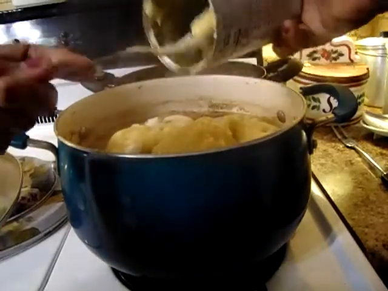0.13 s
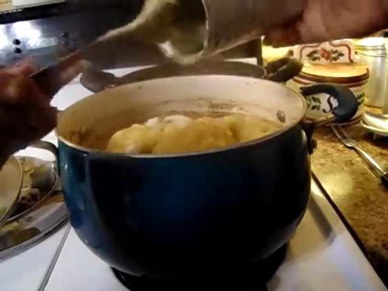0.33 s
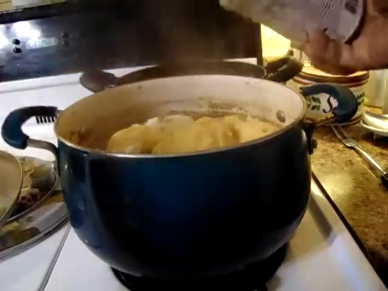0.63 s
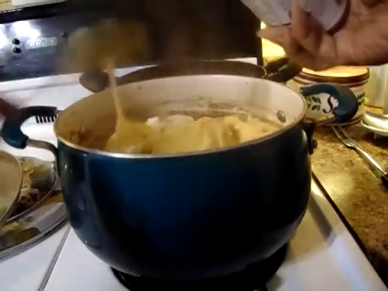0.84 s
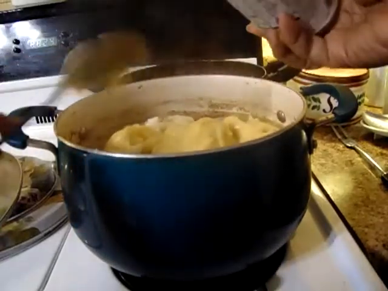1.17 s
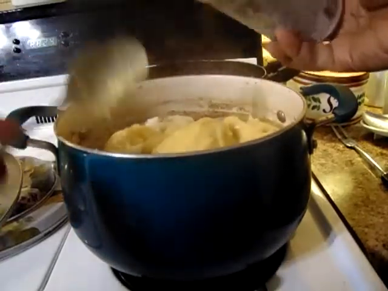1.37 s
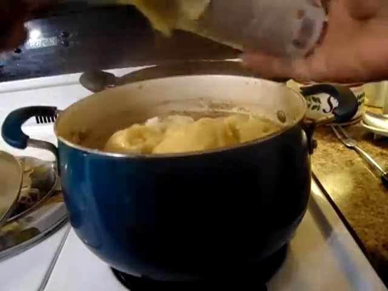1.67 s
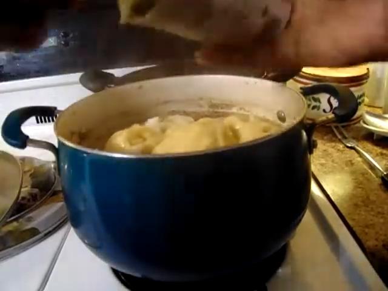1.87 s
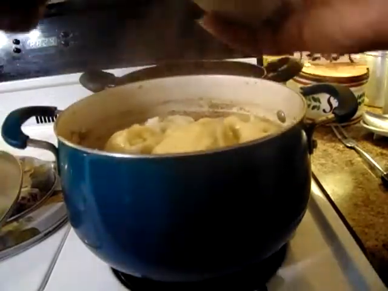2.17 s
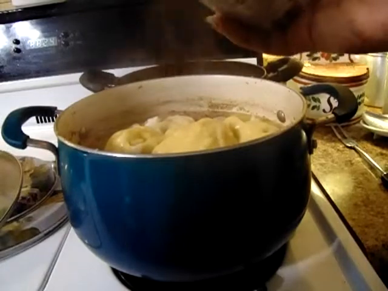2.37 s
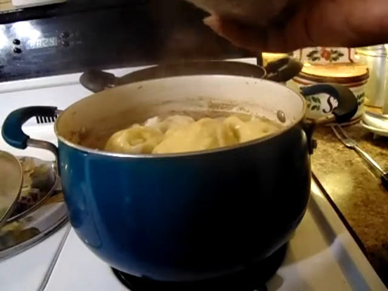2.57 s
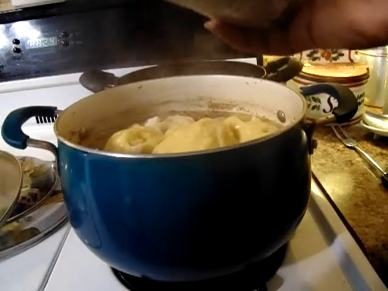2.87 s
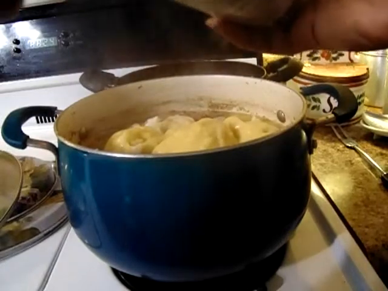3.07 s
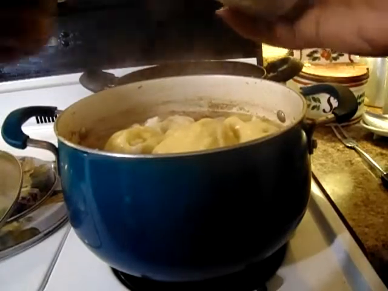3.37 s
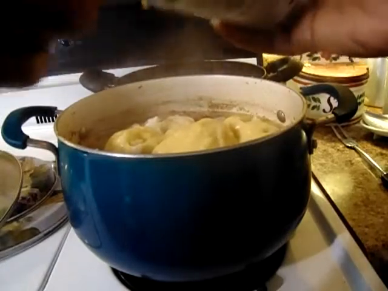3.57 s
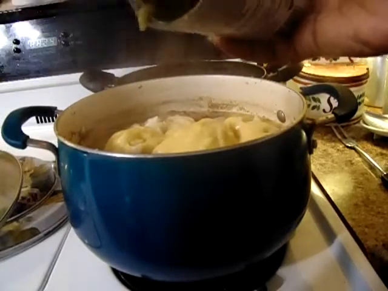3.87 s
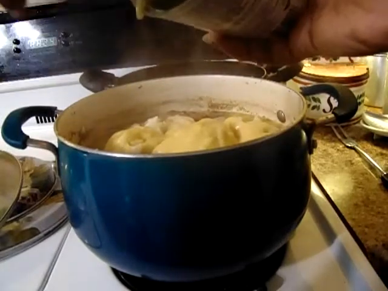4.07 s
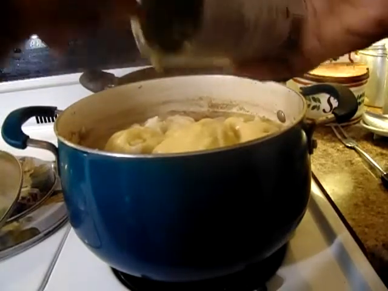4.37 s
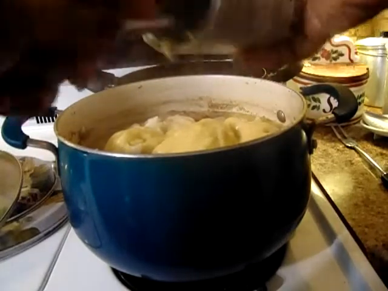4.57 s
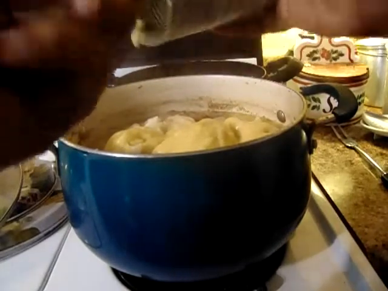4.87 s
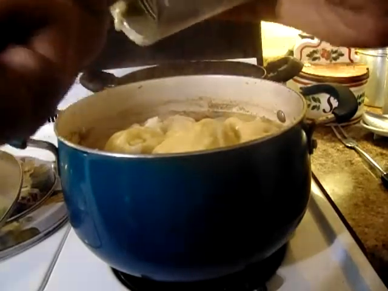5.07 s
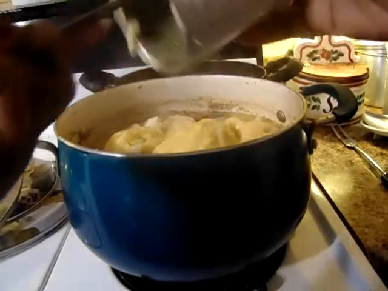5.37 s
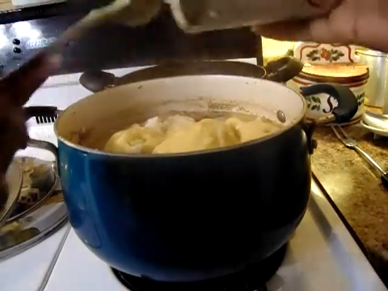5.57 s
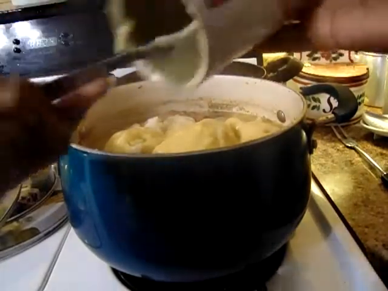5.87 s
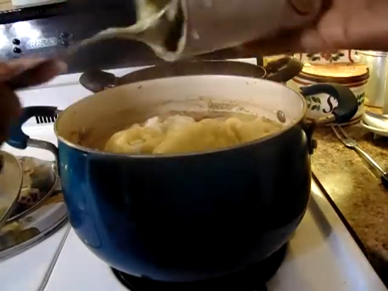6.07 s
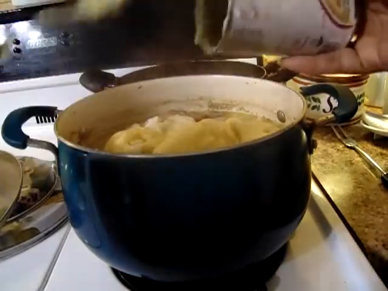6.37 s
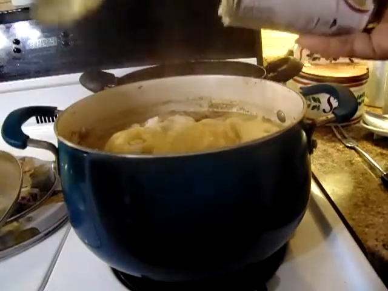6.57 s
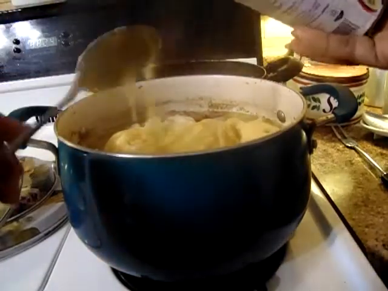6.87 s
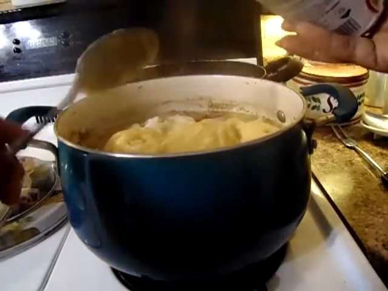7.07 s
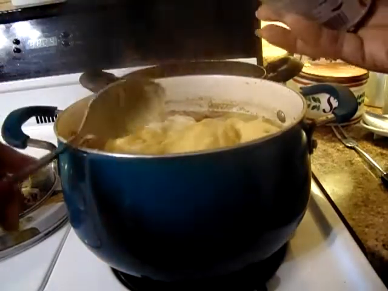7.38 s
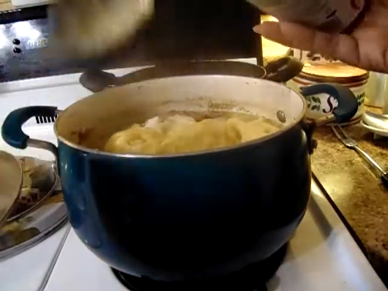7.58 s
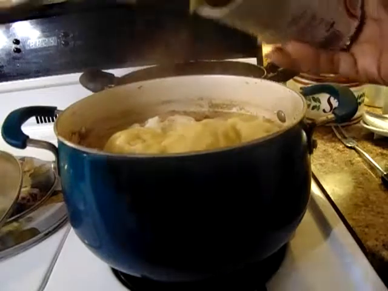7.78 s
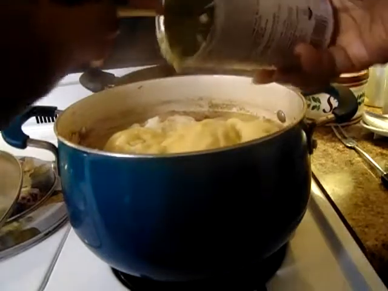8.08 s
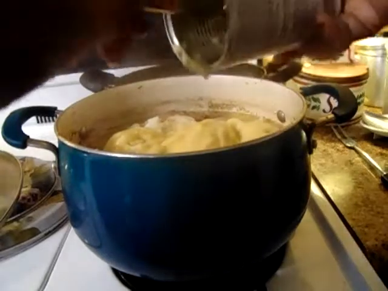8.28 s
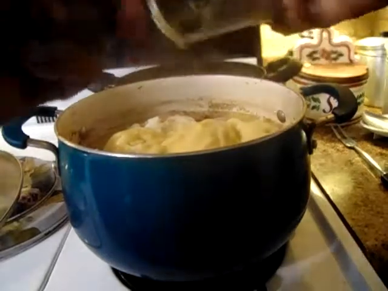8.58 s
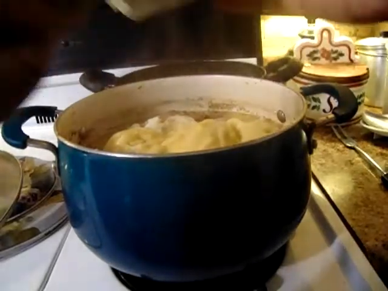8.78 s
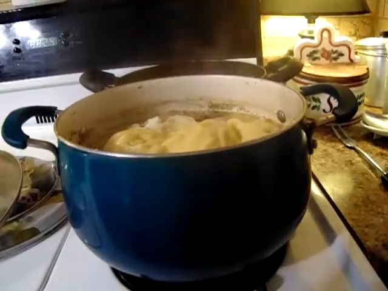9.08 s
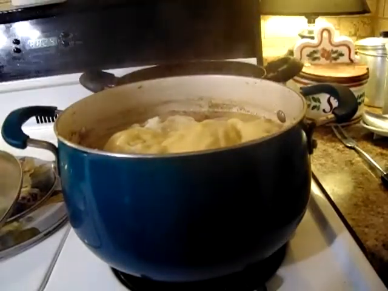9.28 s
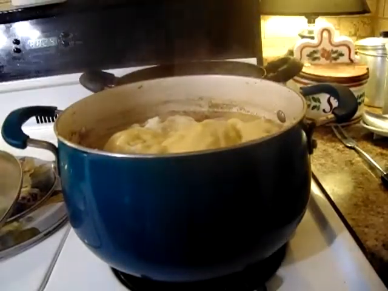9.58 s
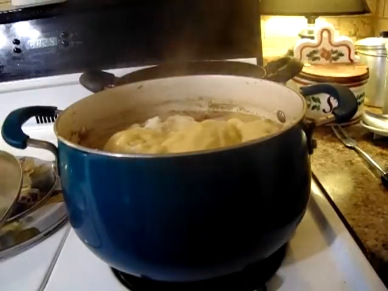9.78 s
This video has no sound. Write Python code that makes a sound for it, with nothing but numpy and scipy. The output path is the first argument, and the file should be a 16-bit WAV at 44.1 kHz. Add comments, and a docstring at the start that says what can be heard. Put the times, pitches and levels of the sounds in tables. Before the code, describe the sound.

Close up in a small kitchen, a steel spoon scrapes thick soup from a tin can with wet squelches, then raps four times on a pot's rim. A long, uneven run of hollow tinny clacks follows, then a brief rattle over ribs, a few more clacks and four more raps. Muffled scoops, another ribbed rattle and a singing scrape finish it, over a quiet simmer and faint hum.

```python
"""A steel spoon digs thick soup out of a tin can over a simmering pot, in a small kitchen.
Soup squelches and the spoon scrapes; four raps on the pot's rim shake the soup off. A long run of
clacks on the can's wall follows, then a rattle over its ribs, more clacks and four more raps.
Last come muffled scoops, a second rattle and a stroke on which the spoon sings. Blows are damped
modes with noise bursts, strokes are resonated noise; bubbles, seething, rumble and hum run throughout."""
import sys
import numpy as np
from scipy import signal
from scipy.fft import rfft, irfft, next_fast_len
from scipy.io import wavfile

SR = 44100
rng = np.random.default_rng(int(sys.argv[2]) if len(sys.argv) > 2 else 0)


def log_audio(samples):
    """Write samples as a 16-bit WAV file to the path given in sys.argv[1]."""
    # one column per channel
    frames = np.atleast_2d(samples).T
    # limit to full scale, then quantise
    limited = np.clip(frames, -1, 1)
    pcm = np.round(limited * 32767).astype(np.int16)
    wavfile.write(sys.argv[1], SR, pcm)


N = 437472
TIME = np.arange(N) / SR  # s, the whole scene
AGE = np.arange(SR // 5) / SR  # s since a blow

# Spoon against can. Each row: start in seconds, relative levels of force and of ring in dB, ring pitch
# in Hz, relative level of the air column in dB, place from 0 at the base to 1 at the mouth.
CLACKS = [(1.6676, -31, -27.5, 2710, -29, .55), (1.8541, -16, -19.5, 2380, -19.5, .55),
          (1.9714, -21, -16, 1850, -36, 0.8), (2.0103, -26.5, -26, 1730, -39, 0.37),
          (2.0972, -17.5, -33, 2070, -35, 0.41), (2.1587, -6, -2.5, 2130, -17.5, .35),
          (2.2252, -19.5, -24.5, 1780, -35, .3), (2.236, -25.5, -28, 2160, -38, 0.27),
          (2.366, -27, -46, 2290, -56, 0.34), (2.4213, -17, -11, 2320, -37, 0.24),
          (2.463, -22.5, -41, 2280, -41, 0.43), (2.4763, -21, -25, 1700, -39, 0.39),
          (2.624, -37, -58, 2470, -63, .3), (2.6591, -22, -17, 2345, -39, 0.29),
          (2.7177, -25.5, -24, 2290, -30, .4), (2.7258, -26, -18, 2190, -51, .7),
          (2.8455, -28.5, -42, 2640, -45, 0.31), (2.9094, -20, -12, 2284, -29.5, 0.31),
          (2.9628, -22, -13.5, 1753, -40, 0.71), (3.0036, -32.5, -27.5, 1720, -44, .55),
          (3.04, -25.5, -21.5, 2290, -33, .5), (3.085, -27.5, -31, 2600, -38.5, .35),
          (3.1187, -22.5, -19.5, 2250, -28, 0.31), (3.1832, -23.5, -21.5, 2210, -27, 0.32),
          (3.1914, -30, -37, 2400, -33.5, .6), (3.3322, -27, -27.5, 2300, -44, 0.42),
          (3.449, -21, -12.5, 2410, -27.5, 0.33), (3.4973, -26, -23.5, 2260, -24.5, .45),
          (3.5553, -37, -31, 1780, -56, 0.56), (3.6421, -33.5, -49, 2400, -48, .25),
          (3.6642, -22.5, -12.5, 2366, -29, 0.27), (3.7459, -19.5, -16.5, 2260, -21.5, 0.37),
          (3.7544, -23.5, -23.5, 1780, -26, .5), (3.8929, -30, -26, 2560, -39, 0.36),
          (3.9227, -22.5, -14.5, 2300, -31.5, 0.33), (3.9828, -21, -17, 2380, -23, .45),
          (3.9927, -19, -17.5, 1806, -34, 0.47), (4.1644, -43.5, -40, 2560, -62, .4),
          (4.276, -25, -16.5, 2584, -33.5, 0.18), (4.3984, -29.5, -24, 2310, -23.5, 0.18),
          (4.534, -17.5, -10, 1945, -18, 0.94), (4.7825, -43.5, -29, 1890, -36.5, 1),
          (5.6896, -34, -21, 2260, -28.5, 0.82), (5.7598, -24, -45, 2360, -28, 0.69),
          (5.8384, -26, -45, 2600, -49, 0.38), (5.9269, -15.5, -3.5, 2480, -35.5, .25),
          (6.0715, -31.5, -22, 2300, -37, .25), (7.8469, -24.5, -16, 2276, -22.5, 0.22),
          (8.0667, -16.5, -8.5, 2440, -35, 0.26), (8.2148, -20.5, -15.5, 2340, -22, 0.37),
          (8.4632, -44.5, -40, 2040, -40.5, .35), (8.5819, -36, -29.5, 1980, -54, .1),
          (8.915, -46, -37, 1860, -56, .15), (9.582, -12.5, -6.5, 2207, -19.5, 0.8),
          (9.6687, -23, -21.5, 2280, -30, 0.97)]
# Modes round the struck spot. Each row: multiple of the ring pitch, relative level in dB, t60 in seconds.
SPOT_MODES = [(0.939, -5, 0.06), (1, 0.5, 0.085), (1.08, -5, .06), (1.34, -10.5, .07), (1.6, -14, .07),
              (1.759, -12.5, .06)]
# The can's sheet metal. Each row: mean pitch in Hz, mean relative level in dB, t60 in seconds.
CAN_MODES = [(1094, -9, 0.017), (1362, -15, 0.081), (1680, -12.5, 0.02), (2310, -9, 0.054),
             (2676, 4, 0.015), (3075, -4, 0.059), (3405, -14, 0.015), (3808, 0.5, 0.035),
             (4140, -10.5, 0.063), (4774, -5.5, 0.035)]
# The air inside the can. Each row: mean pitch in Hz, mean relative level in dB, t60 in seconds.
AIR_MODES = [(638, -4, 0.022), (746.3, 1.5, 0.065)]
# The can's base, damped by the hand. Each row: mean pitch in Hz, mean relative level in dB, t60 in seconds.
BASE_MODES = [(250, -6.5, 0.01), (351, 3, 0.025), (464, 1, 0.023), (490, 2, 0.018), (600, -6.5, 0.041)]
# Colour of the can's crack. Each row: frequency in Hz, relative level in dB per Hz.
CAN_CRACK = [(200, -9), (900, -17.5), (3000, -7), (4500, -9.5), (5200, -1.5), (5800, -3.5), (6800, -6.5),
             (8300, -6), (9500, -4.5), (11300, -1.5), (12700, 0.5), (14500, -4.5)]
# Wall overtones, thump of the base and crack, in dB relative to the force, for a blow at the base
WALL_DB, THUMP_DB, CRACK_DB = -14, -4, -1.5
# Change in dB from base to mouth: the wall rings more freely and the base thumps less
MOUTH_WALL_DB, MOUTH_THUMP_DB = 13, -26


def clacks():
    """Impact excitation: wall modes ring at a pitch set by spot and grip, the enclosed air sounds hollow."""
    metal, body = np.zeros((2, N))
    # the spoon stays on the wall and chokes the ring
    pressed = np.exp(-(AGE / 0.0084) ** 3) + amp(-21.5)
    for s, force_db, ring_db, ring_hz, air_db, place in CLACKS:
        spot_modes = [(ring_hz * ratio, db, t60) for ratio, db, t60 in SPOT_MODES]
        spot = punch(ring(spot_modes, detune=0.0056, count=1) * pressed)
        wall = ring(CAN_MODES, detune=0.033, count=2)
        wall_db = force_db + WALL_DB + MOUTH_WALL_DB * place
        add(metal, s, amp(ring_db - 8) * spot + amp(wall_db) * wall)
        burst = crack(CAN_CRACK, t60=0.024, tail_db=-40.5, tail_t60=0.08)
        add(metal, s, amp(force_db + CRACK_DB) * burst)
        air = ring(AIR_MODES, detune=0.02, count=1)
        thump = ring(BASE_MODES, detune=0.041, count=1)
        thump_db = force_db + THUMP_DB + MOUTH_THUMP_DB * place
        add(body, s, amp(air_db - 3) * air + amp(thump_db) * thump)
    return low_cut(metal, hz=920) + low_cut(body, hz=176)


# Runs over the ribs, one list each. Each row: time in seconds, ribs per second, relative level in dB.
RIB_RUNS = [
    [(5.42, 139, -40.5), (5.45, 121, -30.5), (5.48, 177, -32), (5.53, 175, -30.5)],
    [(9.2145, 88, -36), (9.24, 88, -25), (9.267, 90, -12.5), (9.285, 112, -26), (9.32, 100, -22),
     (9.36, 114, -29)],
]


def ribs():
    """Periodic impacts: the spoon's edge drops into one groove after another, at a varying rate."""
    out = np.zeros(N)
    for run in RIB_RUNS:
        s, rate, db = np.transpose(run)
        passed = np.cumsum(np.interp(TIME, s, rate, left=0, right=0)) / SR
        reaches_rib = np.diff(np.ceil(passed)) > 0
        for at in TIME[1:][reaches_rib]:
            late, size = rng.standard_normal(2)
            wall = amp(-6) * ring([(1120, 0, .015), (1850, 0, .015), (2330, -2, .03)], detune=.06, count=1)
            air = amp(-6.5) * ring([(680, 0, .06), (325, -8, .025)], detune=.035, count=1)
            tick = amp(-1) * crack(CAN_CRACK, t60=.006, tail_db=-32, tail_t60=.03)
            level = amp(np.interp(at, s, db) + 2.2 * size)
            add(out, at + 0.00034 * late, level * (wall + air + tick))
    return low_cut(out, hz=130)


# Long strokes round the wall. Each row: start, hardest moment and end in seconds, relative levels of
# body and of hiss in dB.
SCRAPES = [(0.262, 0.32, .36, -34, -34.5), (0.354, 0.41, 0.43, -28, -21),
           (1.713, 1.731, 1.7555, -37.5, -26), (5.42, 5.477, 5.555, -30, -26.5),
           (5.692, 5.774, 5.79, -28.5, -25), (6.062, 6.087, 6.18, -32.5, -34),
           (6.17, 6.197, 6.31, -33, -33), (8.514, 8.53, 8.54, -42, -37), (9.203, 9.28, 9.35, -28, -38),
           (9.34, 9.387, 9.413, -30.5, -24.5), (9.67, 9.75, 9.9, -36, -34.5),
           (9.829, 9.84, 9.855, -39, -41.5)]
# Short slides after a clack. Each row: start and end in seconds, relative level in dB, growth in dB.
SLIDES = [(1.943, 2.018, -37, -3), (2.174, 2.236, -51, -6), (2.432, 2.473, -48, 6), (2.68, 2.736, -40, 17),
          (2.92, 2.96, -44, 12), (3.118, 3.201, -40, 27), (3.46, 3.519, -44.5, 15), (3.724, 3.762, -32, 7),
          (3.953, 4.001, -33.5, 4), (4.371, 4.419, -47, -16), (5.813, 5.927, -44, -2.5),
          (7.863, 7.921, -37.5, -1), (8.373, 8.392, -44, -1), (9.603, 9.627, -42, -13)]
# Scoops deep in the can, muffled by soup. Each row: start, hardest moment and end in seconds,
# relative level in dB.
SCOOPS = [(7.9, 8.1, 8.33, -49), (8.463, 8.61, 8.88, -45)]
# The rubbed can, spoon near its mouth. Each row: resonance in Hz, width in Hz, relative level in dB.
RUBBED = [(359, 41, -15), (710, 55, 2.5), (1140, 390, -1), (1600, 350, -6), (1838, 55, -2), (2320, 70, 7),
          (2700, 180, -8), (3040, 120, -7.5), (3900, 100, -7), (5020, 74, -10.5), (6060, 66, -12)]
# The rubbed can, spoon deep inside. Each row: resonance in Hz, width in Hz, relative level in dB.
DEEP = [(720, 58, 6), (1990, 72, 3.5), (2400, 81, -5), (2900, 160, -7.5), (3950, 110, -20)]
# The steel spoon's own ring. Each row: resonance in Hz, width in Hz, relative level in dB.
SPOON = [(5230, 160, -5.5), (5466, 140, 2.5), (3970, 90, -1.5)]
# Colour of the rubbing hiss. Each row: frequency in Hz, relative level in dB per Hz.
RUB_HISS = [(2500, -30), (4200, -10.5), (4700, -17.5), (5250, -0.5), (5800, -7.5), (6300, -9), (7000, -7.5),
            (7800, -7.5), (8800, -7.5), (10400, 1.5), (11800, -2.5), (13600, 1.5), (14400, -10.5)]
SWELL_DB, EASE_DB = 8.5, 6.5  # a stroke grows to its hardest moment, then eases off
HISS_GROWS = 1.2  # the hiss follows the pressure more steeply than the body


def stroke(start, hardest, end):
    """Contact pressure: in dB along one stroke, with its peak at the hardest moment."""
    return np.interp(TIME, [start, hardest, end], [-SWELL_DB, 0, -EASE_DB])


def slips(rate, rough_db):
    """Friction noise: dense, uneven little slips, as noise of randomly wandering level."""
    return rng.standard_normal(N) * amp(rough_db * wobble(rate))


def scrapes():
    """Friction excitation: slips drive the can's resonances in long strokes, slides and muffled scoops."""
    grit = slips(rate=450, rough_db=4.3)
    body = coloured(resonate(grit, RUBBED), [(100, -7.0), (400, -6.0), (5500, -1), (9000, -23.5)])
    spoon_ring = resonate(slips(rate=310, rough_db=7.5), SPOON)
    hiss = unit(coloured(grit, RUB_HISS) + amp(-14.5) * spoon_ring)
    out = np.zeros(N)
    for start, hardest, end, body_db, hiss_db in SCRAPES:
        press_db = stroke(start, hardest, end)
        rub = amp(body_db + press_db - 5) * body
        rub += amp(hiss_db + HISS_GROWS * press_db - 4.0) * hiss
        out += gate(start, end, fade=0.0093) * rub
    slide = unit(hiss + amp(-5.0) * body)
    for start, end, db, growth_db in SLIDES:
        slope_db = growth_db * np.interp(TIME, [start, end], [-.5, .5])
        out += gate(start, end, fade=.01) * amp(db + slope_db) * slide
    deep = resonate(grit, DEEP)
    for start, hardest, end, db in SCOOPS:
        press_db = stroke(start, hardest, end)
        out += gate(start, end, fade=0.026) * amp(db + press_db - 3.5) * deep
    # pulled clear of the soup, the spoon sings steadily along a late stroke
    sing = amp(-39.5 - EASE_DB) * gate(9.668, 9.85, fade=0.0057) * resonate(grit, SPOON)
    return out + sing


# Spoon on the pot's rim. Each row: start in seconds, relative levels of force, clank and thud in dB.
RAPS = [(0.7246, -13.5, -7, -37), (0.8952, -17, -9.5, -41), (1.0726, -15.5, -2, -37),
        (1.2478, -19.5, -1, -34), (6.781, -13.5, -3.5, -29.5), (6.9426, -18, -3.5, -29.5),
        (7.1307, -17, -1, -30.5), (7.3203, -19, -.5, -31)]
# Spoon and rim together. Each row: mean pitch in Hz, mean relative level in dB, t60 in seconds.
RIM_MODES = [(1056, -18, 0.067), (1358, -14.5, 0.13), (2006, -7.5, 0.0099), (2410, -5, 0.023),
             (2560, -5, 0.025), (2870, -26, 0.012), (3640, -1.5, 0.027), (3796, -6, 0.048),
             (5174, 3.5, 0.028), (5370, -12, 0.047), (5540, -22.5, 0.053), (5700, 4, 0.024),
             (7820, -3, 0.035)]
# Colour of the rim's crack. Each row: frequency in Hz, relative level in dB per Hz.
RIM_CRACK = [(100, -13.5), (700, -6), (2500, 6.5), (4500, 6), (5500, -7), (6800, 5), (8000, -3.5),
             (9500, 2), (11100, 6.5), (14500, -3)]
# The full pot on the burner. Each row: mean pitch in Hz, mean relative level in dB, t60 in seconds.
POT_MODES = [(290, 0.5, 0.11), (354, -1, .13), (424, -6, 0.15), (471, 2, 0.13), (520, -4.5, 0.13),
             (650, -16, 0.18)]
# Colour of the pot's shudder on its burner. Each row: frequency in Hz, relative level in dB per Hz.
SHUDDER = [(60, -22), (120, -10), (220, -18), (340, -3.5), (470, -2), (640, -6.5), (900, -18),
           (3000, -60.5)]
SHUDDER_DB = -15  # the pot's shudder relative to the force


def raps():
    """Impact with rebound: rim and spoon ring on, while the heavy pot thuds and shudders on the burner."""
    out = np.zeros(N)
    for s, force_db, clank_db, thud_db in RAPS:
        for delay, drop_db in [(0, -5), (.0055, -11)]:  # the blow and its rebound, s and dB
            clank = ring(RIM_MODES, detune=.03, count=6)
            tick = crack(RIM_CRACK, t60=0.019, tail_db=-21.5, tail_t60=0.2)
            blow = amp(clank_db - 10) * clank + amp(force_db + 3.5) * tick
            add(out, s + delay, amp(drop_db) * blow)
        sing = resonate(rng.standard_normal(len(AGE)), SPOON) * amp(-60 * AGE / 0.21)
        add(out, s, amp(clank_db - 31) * sing)
        thud = unit(ring([(218, -1.5, 0.061), (113, -9, 0.075)], detune=0.018, count=1))
        add(out, s, amp(thud_db - 10.5) * thud)
        shudder = crack(SHUDDER, t60=0.22, tail_db=-19, tail_t60=.25)
        shudder += amp(-13.0) * unit(ring(POT_MODES, detune=0.015, count=2))
        add(out, s, amp(force_db + SHUDDER_DB) * shudder)
    return low_cut(out, hz=53.8)


# Sticky soup pulling and plopping. Each row: time of the peak in seconds, relative level in dB,
# length in seconds, pitch of the air pocket in Hz.
SQUELCHES = [(0.076, -35, 0.039, 1400), (0.148, -40.5, 0.048, 1300), (0.561, -34, 0.031, 1400),
             (0.637, -35.5, 0.028, 1300), (0.697, -35.5, 0.048, 2500), (1.012, -37, 0.011, 2700),
             (1.442, -39.5, 0.011, 3700), (1.496, -43, 0.013, 1200), (4.268, -40, 0.0069, 1350),
             (4.909, -46.5, 0.031, 1400), (5.195, -45, 0.012, 1400), (5.353, -42, 0.024, 1500),
             (5.399, -35, 0.022, 1500), (6.345, -43.5, 0.015, 2500), (6.539, -42, 0.015, 1500),
             (6.645, -47.5, 0.032, 1500), (6.761, -35, 0.0084, 1400), (7.707, -41, 0.011, 1400),
             (8.324, -46.5, 0.022, 1300), (8.874, -43.5, 0.017, 3200), (8.974, -39, 0.014, 3700),
             (9.081, -39, 0.024, 3400)]
# Colour of the wet crackle. Each row: frequency in Hz, relative level in dB per Hz.
SOUP = [(200, -4), (600, -3.5), (1300, 1.5), (2200, -6.5), (3600, -6), (6000, -13.5), (14000, -16)]
POCKET_WIDTH, POCKET_DB = .4, -4.5  # a pocket's bandwidth over its pitch; its level over the crackle


def squelches():
    """Cavity resonance: pockets of air colour clumps of wet crackle as soup pulls away from tin and spoon."""
    out, middle = np.zeros(N), AGE.mean()
    crackle = coloured(slips(rate=450, rough_db=7.0), SOUP)
    for s, db, length, hz in SQUELCHES:
        first = rng.integers(N - len(AGE))
        clump = unit(crackle[first:][:len(AGE)])
        pocket = resonate(clump, [(hz, POCKET_WIDTH * hz, 0)])
        clump = unit(clump + amp(POCKET_DB) * pocket)
        swell = np.exp(-2 * ((AGE - middle) / length) ** 2)
        add(out, s, amp(db - 4.5) * clump * swell)
    return np.roll(out, -len(AGE) // 2)  # each clump peaks at its time


# How hard the pot seethes. Each row: time in seconds, relative level in dB.
SIMMER = [(0, -46), (.83, -50.5), (1.55, -55.5), (2.04, -52.5), (2.55, -63.5), (4.1, -58), (4.56, -52.5),
          (5.1, -58.5), (5.9, -50.5), (6.35, -57), (7.7, -56), (8.1, -52.5), (9.92, -53.5)]


def bubbles(count=2400):
    """Transient oscillation: many small soft bubbles burst in the thick broth, with a faint sputter."""
    out, t = np.zeros(N), AGE[:SR // 25]
    for at, pitch, faintness in rng.uniform(size=(count, 3)):
        hz = 320 * 6 ** pitch
        cycles = hz * t
        burst = np.sin(2 * np.pi * cycles) * cycles * np.exp(-cycles / 1.3)
        add(out, at * N / SR, amp(-26 * np.sqrt(faintness)) * burst)
    sputter = unit(coloured(slips(rate=450, rough_db=6), SOUP) * amp(5 * wobble(25)))
    simmer_db = np.interp(TIME, *np.transpose(SIMMER))
    return amp(simmer_db - 3.5) * unit(out) + amp(-63.0) * sputter


# Colour of the seething. Each row: frequency in Hz, relative level in dB per Hz.
STOVE = [(53, -36), (90, -5.5), (174, -8), (343, -1), (536, -6), (596, -10), (837, -22), (1310, -5),
         (2220, -23), (3060, -18.5), (5780, -24), (13500, -24), (14400, -45.5)]


def stove():
    """Broadband noise and a pure tone: the pot's seething, over room rumble and mains hum."""
    seethe_db = np.interp(TIME, *np.transpose(SIMMER)) + 4.0 * wobble(10)
    seethe = amp(seethe_db - 2.0) * coloured(rng.standard_normal(N), STOVE)
    rumble_colour = [(10, -6.5), (25, 1.5), (40, -3.5), (60, -1.0), (85, -9.0), (200, -7.5), (1000, -51)]
    rumble = amp(-63.0) * coloured(rng.standard_normal(N), rumble_colour)
    hum = amp(-61.0) * np.sin(2 * np.pi * 59.5 * TIME)
    return seethe + rumble + hum


# Reverberation of the kitchen. Each row: frequency in Hz, t60 in seconds.
KITCHEN = [(150, 0.38), (700, 0.3), (2500, 0.32), (6000, 0.29), (14000, .24)]


def kitchen(x, near_db, room_db):
    """Reflection: hob and back panel answer within milliseconds, then the room, as decaying noise."""
    out, hop = np.zeros(N), SR // 4  # the echo pattern is drawn afresh each quarter second
    for i in range(0, N, hop):
        hz, t, z = signal.stft(rng.standard_normal(SR // 2), SR, nperseg=256)
        decay = amp(-60 * t / along(KITCHEN, hz)[:, None])
        tail = signal.istft(z * decay, SR, nperseg=256)[1]
        tail[:SR // 200] = 0  # the room is silent for 5 ms
        near = rng.standard_normal(len(AGE)) * (AGE > .002) * amp(-60 * AGE / 0.063)
        answer = amp(room_db) * tail / np.linalg.norm(tail)
        add(answer, 0, amp(near_db) * near / np.linalg.norm(near))
        add(out, i / SR, signal.fftconvolve(x[i:i + hop], answer))
    return x + out


def ring(modes, detune, count=2):
    """Modal synthesis: damped modes in close groups; strength and pitch vary at random from blow to blow."""
    hz, db, t60 = np.transpose(np.repeat(modes, count, axis=0))[:, :, None]
    size, shift, side = rng.standard_normal((3, len(hz), 1))
    waves = np.sign(side) * np.sin(2 * np.pi * hz * (1 + detune * shift) * AGE)
    return punch(np.sum(amp(db + 2 * size - 60 * AGE / t60) * waves, axis=0))


def crack(spectrum, t60, tail_db, tail_t60):
    """High modal density: crowded modes heard as noise, a sharp burst and a weak longer ring."""
    fall = amp(-60 * AGE / t60) + amp(tail_db - 60 * AGE / tail_t60)
    return punch(coloured(rng.standard_normal(len(AGE)), spectrum) * fall)


def resonate(x, peaks):
    """Resonance: pass x through parallel (Hz, width Hz, dB) band-passes, at rms 1."""
    def response(f):
        return sum(amp(db) * 1j * f * w / (c * c - f * f + 1j * f * w) for c, w, db in peaks)
    return unit(filtered(x, response))


def low_cut(x, hz):
    """Radiation efficiency: small bodies radiate little bass."""
    return signal.sosfilt(signal.butter(2, hz, "high", fs=SR, output="sos"), x)


def coloured(x, spectrum):
    """Spectral shaping: filter x by (Hz, dB) points, at rms 1."""
    return unit(filtered(x, lambda hz: amp(along(spectrum, hz))))


def filtered(x, response):
    """Linear filtering: multiply the spectrum of x by a response of frequency."""
    m = next_fast_len(len(x) + 8192)
    return irfft(rfft(x, m) * response(np.fft.rfftfreq(m, 1 / SR)), m)[:len(x)]


def along(points, hz):
    """Logarithmic frequency: read (Hz, value) points on a log axis."""
    f, v = np.transpose(points)
    return np.interp(np.log(hz + 1), np.log(f + 1), v)


def wobble(rate):
    """Random modulation: a curve of straight lines between random knots, rate knots a second."""
    knots = rng.standard_normal(int(N * rate / SR) + 4)
    return np.interp(TIME * rate, np.arange(len(knots)), knots)


def gate(start, end, fade):
    """Envelope: one between two times, with short slopes."""
    return np.clip(np.minimum(TIME - start, end - TIME) / fade + .5, 0, 1)


def amp(db):
    """Level: decibels to gain."""
    return 10 ** (np.asarray(db) / 20)


def unit(x):
    """Effective value: scale to rms 1."""
    return x / np.sqrt(np.mean(x ** 2) + 1e-20)


def punch(x):
    """Onset level: scale a blow to rms 1 over its first five milliseconds."""
    return x / np.sqrt(np.mean(x[:SR // 200] ** 2) + 1e-20)


def add(track, s, sound):
    """Superposition: mix a sound into a track at a time in seconds."""
    part = track[max(round(s * SR), 0):][:len(sound)]
    part += sound[:len(part)]


def scene():
    """Direct against reflected sound: the can is close and dry, the pot sends more into the kitchen."""
    can = kitchen(clacks() + ribs() + scrapes() + squelches(), near_db=-9, room_db=-13.0)
    pot = kitchen(raps() + bubbles(), near_db=-11, room_db=-10)
    return (can + pot + stove())[None]


TOP_HZ = 14350  # band limit


def record(dry):
    """Band limiting: the recorder clips at full scale, then falls off steeply above its band limit."""
    clipped = np.clip(dry[0], -1, 1)
    return filtered(clipped, lambda hz: 1 / np.sqrt(1 + (hz / TOP_HZ) ** 160))[None]


dry = scene()
out = record(dry)
log_audio(out)
```